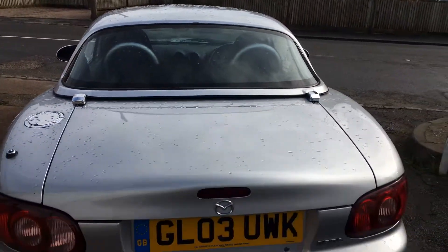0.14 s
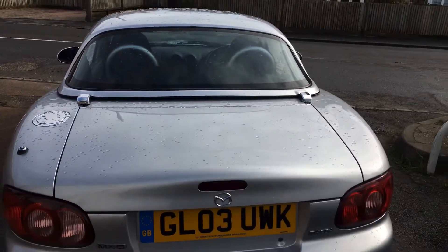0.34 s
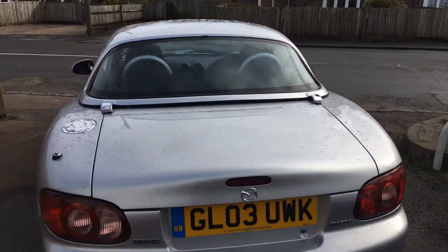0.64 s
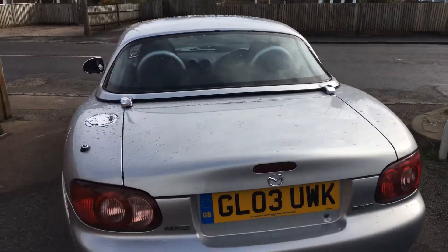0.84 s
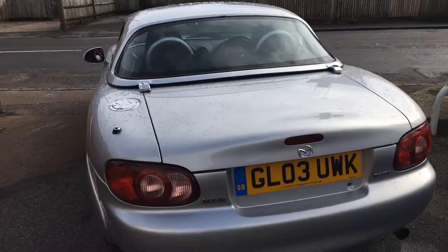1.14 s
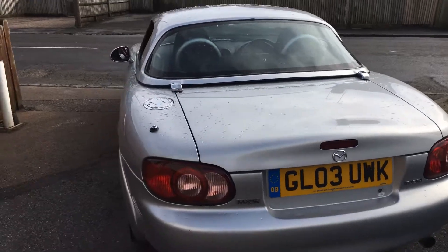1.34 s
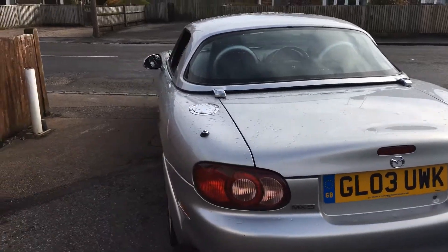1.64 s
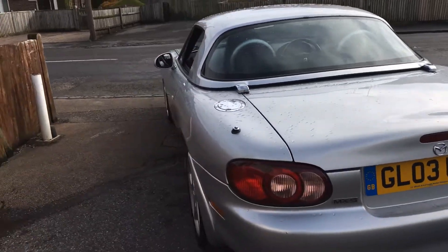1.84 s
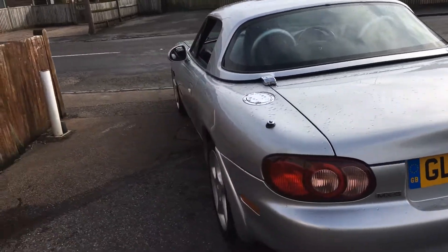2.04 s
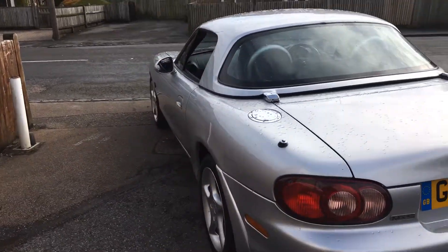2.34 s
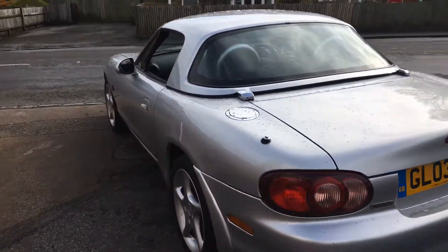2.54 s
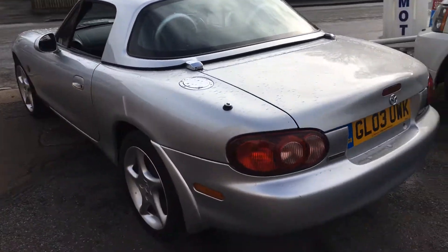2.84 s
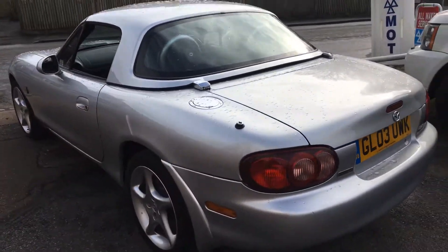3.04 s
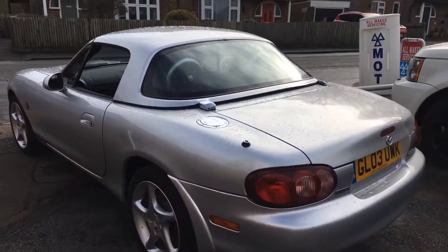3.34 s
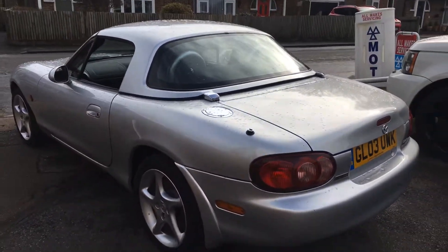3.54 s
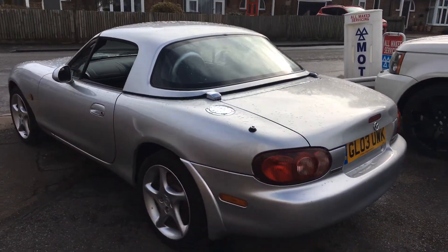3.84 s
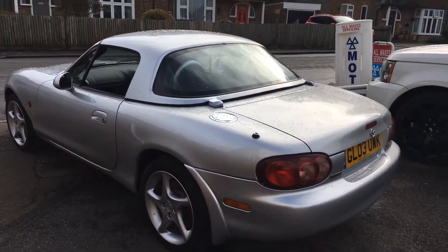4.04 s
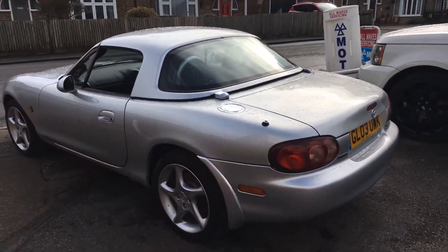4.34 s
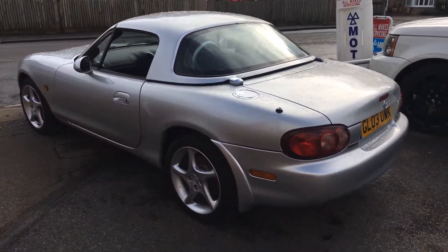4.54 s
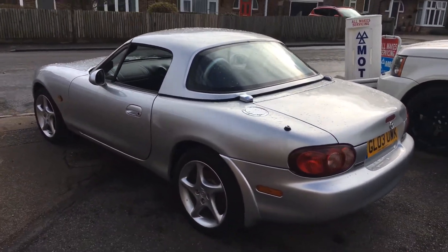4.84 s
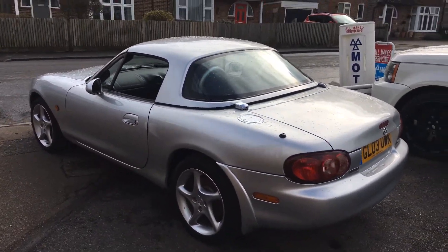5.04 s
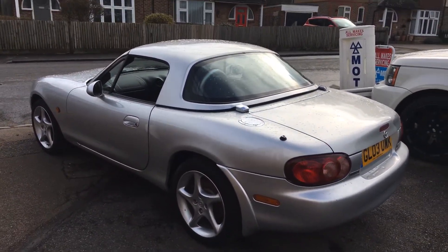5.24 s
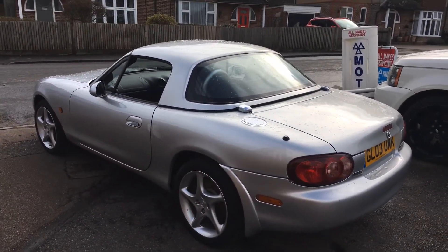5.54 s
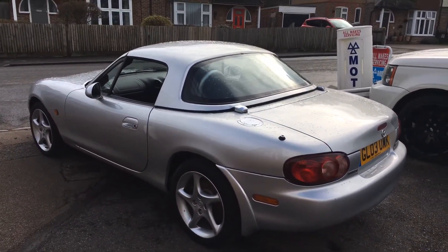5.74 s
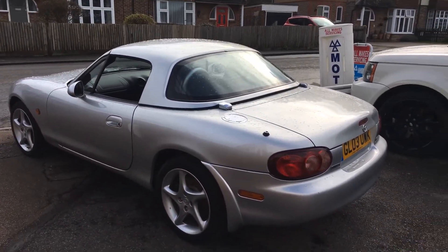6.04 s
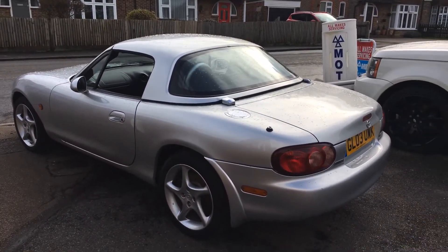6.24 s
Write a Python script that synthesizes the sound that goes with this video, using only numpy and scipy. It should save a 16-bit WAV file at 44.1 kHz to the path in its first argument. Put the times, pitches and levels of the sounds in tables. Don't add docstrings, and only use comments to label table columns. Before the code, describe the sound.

Handheld microphone outdoors beside a parked car. Distant traffic roars faintly and steadily, a thin machine whine fading early. From just after one second, low wind puffs thud irregularly against the microphone, with gritty footstep ticks and tiny key clinks between. A calmer stretch follows, then near the end a huge burst of wind overloads, the background jumps much louder, and small birds chirp.

```python
import sys
import numpy as np
from scipy import signal
from scipy.io import wavfile
from scipy.ndimage import minimum_filter1d, map_coordinates

SR = 44100
rng = np.random.default_rng(int(sys.argv[2]) if len(sys.argv) > 2 else 0)


def decibels_to_gain(level_db):
    exponent = np.asarray(level_db, float) / 20
    return 10 ** exponent


def unload_wav(signal):
    wavfile.write(
        sys.argv[1],
        SR,
        np.round(np.clip(np.atleast_2d(signal).T, -1, 1) * 32767).astype(np.int16),
    )


N = 281358
SECONDS = np.arange(N) / SR
STEP_S, STEP_DB = 5.535, 19

# top_s, top_db
BUFFETS = [(1.114, -45), (1.58, -36), (1.62, -43), (1.668, -40), (1.718, -43), (2.79, -39), (2.85, -43),
           (3.18, -40), (3.37, -43), (3.475, -42), (3.625, -46), (3.835, -47), (4.83, -61), (5.305, -46),
           (5.485, -43), (5.675, -25), (5.83, -32), (1.235, -30), (2.645, -35), (2.97, -33), (5.768, -26),
           (5.8, -32)]


def in_time(rows):
    s, *columns = np.transpose(rows)
    return [np.interp(SECONDS, s, column) for column in columns]


def after_step():
    return SECONDS - STEP_S


def rms_one(x):
    return x / np.sqrt(np.mean(x ** 2) + 1e-20)


def cut(x, hz, kind, order):
    return signal.sosfilt(signal.butter(order, hz, kind, fs=SR, output="sos"), x)


def drift(rate):
    r = np.exp(-80 * np.pi * rate / SR)
    white = rng.standard_normal(N // 40 + 2002)
    slow = signal.lfilter([1], [1, -2 * r, r * r], white)[2000:]
    return np.interp(np.arange(N) / 40, np.arange(len(slow)), rms_one(slow))


def ring(x, hz, t60):
    r, w = decibels_to_gain(-60 / (t60 * SR)), 2 * np.pi * hz / SR
    return signal.lfilter([0, np.sin(w)], [1, -2 * r * np.cos(w), r * r], x + 1e-18)


def add(out, s, x):
    i = int(s * SR)
    out[i:i + len(x)] += x[:N - i]


def street_levels():
    # time_s, level_db before the level is turned up
    tyre_roar = [(0, -62), (.5, -60.5), (1, -61.5), (1.6, -62.5), (2.2, -64.5), (2.8, -66), (3.4, -65.5),
                 (4, -65.5), (4.6, -65.5), (5.1, -63.5), (5.5, -62), (5.6, -66.5), (6.38, -64.5)]
    drone_db, drone_start_db, drone_fade_s = -3, 13, 0.75
    swell_db, swell_s, swell_width_s = 3, 4.75, .35
    hiss_db, hiss_follows, air_db, air_follows = 1.64, .45, 4, .05
    turned_drone_db, turned_hiss_db, turned_air_db = 5, 6.5, -12
    roar_db, = in_time(tyre_roar)
    up = after_step() > 0
    swing_db = roar_db + 63.5
    settle_db = up * 3 * np.exp(-np.abs(after_step()) / 0.19)
    low_db = drone_db + drone_start_db * np.exp(-SECONDS / drone_fade_s) - swing_db
    low_db = low_db + up * turned_drone_db
    low_db = low_db + swell_db * np.exp(-((SECONDS - swell_s) / swell_width_s) ** 2)
    upper_db = hiss_db - (1 - hiss_follows) * swing_db + up * turned_hiss_db + settle_db
    top_db = air_db - (1 - air_follows) * swing_db + up * turned_air_db + settle_db
    return roar_db + up * STEP_DB, low_db, upper_db, top_db


def street(patchy_db, quiet_top_db):
    control_hz = [400, 2200, 3600, 10000]
    # pitch_hz, density_db (dB per Hz)
    colour = [(150, 0), (350, -2), (480, -6.5), (700, -3), (1000, 1.5), (1700, 1.5), (2100, -4),
              (2600, -15), (3300, -23), (4500, -27.5), (5300, -28.5), (7000, -32.5), (9500, -35.5),
              (12200, -36.5), (15000, -42)]
    roar_db, low_db, upper_db, air_db = street_levels()
    controls = [low_db, 0 * roar_db, upper_db, air_db]
    hz, density_db = np.transpose(colour)
    white = rng.standard_normal((2, N))
    edges = np.append(88 * 2 ** np.arange(0, 7.4, 1 / 3), 16000)
    out, together = 0, drift(22)
    for k, (low, high) in enumerate(zip(edges, edges[1:])):
        place = np.log(low * high) / 2
        shares = [np.interp(place, np.log(control_hz), row) for row in np.eye(4)]
        moved_db = sum(share * control for share, control in zip(shares, controls))
        if high == edges[-1]:
            moved_db = moved_db + quiet_top_db * (after_step() < 0)
        flicker_db = patchy_db * (0.83 * together + drift(14))
        band_db = np.interp(place, np.log(hz), density_db) + flicker_db + moved_db + roar_db + 11.0
        out = out + decibels_to_gain(band_db) * cut(white[k % 2], [low, high], "band", order=4)
    return out


def whine():
    # time_s, level_db
    fading = [
        (0, -83.5),
        (.4, -82.5),
        (.8, -83.5),
        (1.2, -88.5),
        (1.8, -92.5),
    ]
    level_db, = in_time(fading + [(2.6, -110)])
    width_hz = 520
    return decibels_to_gain(level_db) * rms_one(ring(rng.standard_normal(N), 5450, 2.5 / width_hz))


def birds():
    # start_s, length_s, start_hz, end_hz, level_db
    clear = [
        (5.958, .055, 7450, 6800, -71.5),
        (6.113, .063, 7900, 6750, -67),
        (6.116, .021, 5600, 6300, -68),
        (6.137, .032, 4500, 4750, -62),
        (6.205, .025, 4170, 4150, -62),
    ]
    # start_s, length_s, start_hz, end_hz, level_db
    hoarse = [
        (3.705, .038, 3950, 3750, -84),
        (4.508, .038, 4550, 4350, -83.5),
        (5.78, .05, 6080, 5900, -69),
        (5.89, .03, 4500, 4500, -64),
        (6.149, .033, 4130, 3850, -57.5),
        (6.175, 0.06, 3200, 3150, -61),
    ]
    out, wobble, flutter = np.zeros(N), drift(130), drift(120)
    # wobble in Hz, arch of the pitch in Hz (whistles sag, chirps arch up in the middle)
    notes = [(*row, 25, -90) for row in clear] + [(*row, 110, 90) for row in hoarse]
    for start, length, start_hz, end_hz, level_db, hoarse_hz, arch_hz in notes:
        span = slice(int(start * SR), int((start + length) * SR))
        u = np.linspace(0, 1, span.stop - span.start)
        glide = np.interp(u, [0, .5, 1], [start_hz, (start_hz + end_hz) / 2 + arch_hz, end_hz])
        pitch = glide + hoarse_hz * wobble[span]
        flutter_db = (1.0 + 0.016 * hoarse_hz) * flutter[span]
        loud = np.sin(np.pi * u) ** 0.37 * decibels_to_gain(level_db + flutter_db)
        out[span] += loud * np.sin(2 * np.pi * np.cumsum(pitch) / SR)
    dull = cut(out, 6800, "low", order=2)
    for lag_s, echo_db in [(.011, -11), (.019, -12), (.031, -13), (.047, -15)]:
        add(out, lag_s, decibels_to_gain(echo_db) * dull)
    return out


def keys():
    # pitch_hz, t60_s
    modes = [
        (5950, .055),
        (8350, .055),
        (14950, .07),
        (5250, .05),
    ]
    # start_s, then the level_db of each mode in turn
    clinks = [
        (2.042, -72, -74, -76, -98.5),
        (2.163, -75, -94.5, -85, -98),
        (2.311, -96, -74.5, -73, -98),
        (2.601, -98, -98, -82, -97.5),
        (2.855, -81, -98, -69, -88),
        (3.988, -80, -71.5, -89.5, -62.5),
        (4.012, -78.5, -77, -98, -71),
        (4.092, -98, -97, -98, -78.5),
        (4.486, -89, -74.5, -88, -96.5),
    ]
    out, table = np.zeros(N), np.array(clinks)
    chatter = np.hanning(260) * rng.standard_normal((len(modes), 260))
    for (hz, t60), strength_db, contact in zip(modes, table[:, 1:].T, chatter):
        clicks = np.zeros(N)
        clicks[(table[:, 0] * SR).astype(int)] = decibels_to_gain(strength_db)
        turning = np.exp(2j * np.pi * hz * np.arange(len(contact)) / SR)
        contact = contact / abs(contact @ turning)
        out += ring(signal.fftconvolve(clicks, contact, "same"), hz, t60)
    return out


def ticks():
    # start_s, peak_db, centre_hz
    grit = [(.353, -62.5, 6300), (1.914, -70, 8600), (1.988, -59, 8000), (1.988, -58, 2000),
            (2.03, -72, 8000), (2.311, -71, 8900), (2.584, -70.5, 11000), (2.61, -71, 3800),
            (2.647, -66, 11500), (2.656, -63, 2200), (2.685, -59, 2050), (2.709, -48, 1700),
            (2.709, -68, 6000), (2.729, -69, 3500), (2.741, -51, 1800), (2.826, -67.5, 6700),
            (2.876, -67, 3600), (2.683, -71.5, 11000), (2.741, -70, 8000), (2.936, -62, 11000),
            (3.008, -62, 11500), (3.099, -62.5, 2400), (3.288, -71, 8400), (3.364, -58, 2600),
            (3.443, -69, 7900), (4.486, -66.5, 9500), (4.538, -71.5, 11700), (5.849, -62, 8800),
            (5.884, -62, 10000)]
    # start_s, peak_db, low_hz, high_hz, t60_s
    scuffs = [(2.717, -71, 2500, 7000, .07), (3.475, -76.5, 7550, 9500, .06), (3.974, -65, 3500, 9500, .03),
              (3.987, -61.5, 2000, 6500, .083), (3.987, -62, 6500, 15600, .079),
              (4.008, -63.5, 4530, 15900, .05), (4.026, -68, 4500, 9500, .043),
              (4.612, -67, 3000, 6200, .07), (4.613, -72, 8200, 9900, .074), (4.629, -67, 3000, 7000, .05),
              (4.643, -59.5, 1000, 5900, .044)]
    # pitch_hz, width_hz, level_db
    hollows = [
        (5540, 770, -2),
        (9000, 710, -5),
    ]
    out, fall = np.zeros(N), np.arange(3500) / SR
    half = 2 ** (1.1 / 2)
    rows = scuffs + [(s, peak_db, hz / half, hz * half, .009) for s, peak_db, hz in grit]
    white = rng.standard_normal((len(rows), 3500))
    for (s, peak_db, low_hz, high_hz, t60), own in zip(rows, white):
        swell = (1 - np.exp(-fall / (.07 * t60))) * decibels_to_gain(-60 * fall / t60)
        burst = cut(own * swell, [low_hz, min(high_hz, 17000)], "band", order=2)
        add(out, s, decibels_to_gain(peak_db) * burst / np.abs(burst).max())
    coloured = 0.69 * out
    for hz, width_hz, level_db in hollows:
        coloured = coloured + decibels_to_gain(level_db) * signal.lfilter(*signal.iirpeak(hz, hz / width_hz, SR), out)
    return coloured


def wind_level():
    # time_s, level_db before the level is turned up
    breeze = [
        (0, -61.5),
        (1.05, -63),
        (1.2, -66),
        (3.9, -66),
        (4.3, -68),
        (5.25, -67),
        (5.9, -62),
        (6.38, -61),
    ]
    # top_s, top_db, rise_s per 20 dB, fall_s per 20 dB
    gusts = [(.43, -54, .04, .5), (.78, -56, .1, 0.41), (.97, -55, 0.04, 0.29), (1.225, -33, .04, .25),
             (1.34, -35, .1, 0.23), (1.5, -46, 0.18, 0.17), (1.79, -44, 0.01, .15), (1.97, -50, 0.04, .2),
             (2.08, -36, 0.05, .25), (2.19, -39, 0.11, 0.14), (2.38, -45, 0.03, .4), (2.64, -41, .3, .4),
             (2.97, -34, 0.1159, 0.13), (3.1, -44, .1, 0.38), (3.29, -42, 0.09, .3),
             (3.69, -38, 0.02, 0.1155), (4.03, -55, 0.08, 0.15), (4.145, -47, 0.09, 0.08),
             (4.68, -59, 0.22, 0.09), (5.15, -57, .15, 0.16), (5.36, -48, 0.09, 0.28),
             (5.57, -31, 0.0571, 0.04), (5.632, -23, 0.0468, 0.06), (5.765, -31, 0.05, 0.09),
             (5.93, -37, .2, 0.12)]
    rumbles = [(s, top_db - 5, .025, .035) for s, top_db in BUFFETS]
    power = decibels_to_gain(in_time(breeze)[0] + STEP_DB * (after_step() > 0)) ** 2
    for s, top_db, rise_s, fall_s in gusts + rumbles:
        below = np.maximum((s - SECONDS) / rise_s, (SECONDS - s) / fall_s)
        power = power + decibels_to_gain(top_db - 20 * below) ** 2
    return 10 * np.log10(power)


def eddies(size):
    large = signal.butter(2, [.008, .026], "band", output="sos")
    small = signal.butter(3, .06, "low", output="sos")
    white = rng.standard_normal((2, size + 2000))
    large_air = rms_one(signal.sosfilt(large, white[0]))
    small_air = rms_one(signal.sosfilt(small, white[1]))
    return rms_one((large_air + 0.16 * small_air)[2000:])


def wind(level_db, rumble_hz, lumpy_db):
    true_db = level_db - STEP_DB * (np.arange(N) > STEP_S * SR)
    lumps = drift(18)
    speed = decibels_to_gain(.33 * lumpy_db * lumps + .15 * (true_db + 48))
    place = np.cumsum(rumble_hz * speed) * 100 / SR
    air = eddies(size=N // 2)
    return decibels_to_gain(level_db + lumpy_db * lumps) * map_coordinates(air, [place], order=3)


def puff_rows(level_db):
    # top_s, peak_db, pitch_hz
    strong = [(1.2156, -25, 219), (1.2257, -30, 207), (1.2626, -32, 177), (1.2991, -32.5, 206),
              (1.4142, -26.5, 217), (1.5815, -30.5, 229), (1.6621, -35, 182), (1.8024, -43, 228),
              (2.0682, -27.5, 182), (2.1023, -31, 190), (2.1594, -28, 202), (2.2005, -31.5, 189),
              (2.2342, -35, 290), (2.2634, -39, 210), (2.43, -40.5, 205), (2.6236, -26.5, 242),
              (2.6392, -31.5, 198), (2.7375, -31, 199), (2.7504, -31, 261), (2.7952, -29, 216),
              (2.8471, -35.5, 222), (2.94, -37, 206), (2.9611, -30, 199), (2.9818, -28, 205.7),
              (3.0054, -33, 236), (3.131, -31.5, 217), (3.466, -43, 191), (3.616, -47, 255),
              (3.8278, -47.5, 199), (5.3017, -46.5, 215)]
    # top_s, peak_db, pitch_hz, length_ms, ragged_db against the peak
    slaps = [(1.334, -37.5, 327, 3.3, -12), (1.3432, -31, 187, 6, -18), (1.373, -22.5, 259.5, 2.05, -19.5),
             (1.7164, -37.5, 245, 2.3, -18), (2.0849, -31, 264, 2.7, -14), (2.1418, -31, 246, 2.8, -13),
             (2.146, -34, 377, 3.9, -6), (2.1903, -30.5, 236, 3.7, -16.5), (2.3728, -39, 223, 3.5, -17),
             (2.6019, -37.5, 275, 4.3, -17), (3.0164, -34.5, 215, 3.9, -16), (3.1496, -34.5, 253, 2.3, -14),
             (3.1716, -38.5, 236, 11.4, -10), (3.2866, -37.5, 223, 6.7, -16.5),
             (3.3456, -31.5, 313.5, 3.5, -8), (3.3648, -34, 341, 3.7, -9), (3.6832, -36.5, 298, 8.3, -10),
             (3.69, -32, 109, 13.7, -22.5), (3.7083, -38.5, 222, 3.3, -13), (5.4685, -49, 276, 6, -13.5),
             (2.5615, -42.5, 265, 10.7, -15), (2.9209, -42, 270, 3.3, -15), (3.2145, -44, 207, 6.5, -15),
             (3.4125, -46, 271, 4.7, -17.5)]
    # top_s, peak_db, pitch_hz, length_ms, ragged_db against the peak
    burst = [
        (5.568, -30.5, 253, 8.7, -15.5),
        (5.621, -22, 296, 3.2, -19),
        (5.627, -12, 218.7, 4.4, -15),
        (5.6315, -10, 100, 8, -25),
        (5.6365, -10.5, 289, 4.6, -17),
        (5.6415, -15, 537, 5.04, -21),
        (5.6525, -24, 205, 2.5, -15.5),
    ]
    gap_s, smooth_fray_db = .022, -23
    s = np.arange(.1, 6.3, gap_s)
    late, size, pitch = rng.standard_normal((len(s), 3)).T
    s = s + gap_s * np.tanh(late) / 2
    level_db = minimum_filter1d(level_db, size=1200)
    here_db = level_db[(s * SR).astype(int)]
    true_db = here_db - STEP_DB * (s > STEP_S)
    small_db = here_db + 0.5 + 3 * size + .35 * (true_db + 45)
    smooth = [(*row, smooth_fray_db) for row in strong]
    smooth += [(a, b, 215 * decibels_to_gain(2.4 * c), -18) for a, b, c in zip(s, small_db, pitch)]
    timed = [(a, b, hz, 4.1 * (210 / hz) ** 1.8, fray_db) for a, b, hz, fray_db in smooth]
    # 100 Hz, 13 ms
    swings = [(a, b + 4.5, 100, 13, smooth_fray_db - 10) for a, b in BUFFETS]
    return slaps + burst + swings + timed


def puffs(rows):
    out, t = np.zeros(N), np.arange(-2000, 2000) / SR
    ragged = rms_one(cut(rng.standard_normal(N), [400, 900], "band", order=3))
    for (s, peak_db, hz, ms, fray_db), turn in zip(rows, rng.random(len(rows))):
        bell = np.exp(-(1250 * t / np.clip(ms, 2, 40)) ** 2)
        phase = np.cumsum(hz * (.5 + 0.61 * bell)) / SR + turn
        fray = bell ** 1.7 * ragged[int(s * SR) - 2000:][:4000]
        fray *= decibels_to_gain(fray_db + 3.0) / np.abs(fray).max()
        add(out, s + t[0], decibels_to_gain(peak_db - 1.0) * (bell * np.cos(2 * np.pi * phase) + fray))
    return out


def scene():
    background = street(patchy_db=0.87, quiet_top_db=-16) + whine() + birds()
    level_db = wind_level()
    air = wind(level_db, rumble_hz=78, lumpy_db=2.5) + puffs(puff_rows(level_db))
    air = cut(air, 37, "high", order=3)
    overload = .36
    air = cut(overload * np.tanh(air / overload), 1600, "low", order=3)
    return (background + keys() + ticks() + air)[None]


def roll_off(x):
    return signal.sosfilt(signal.butter(12, 15750, fs=SR, output="sos"), x)


def record(dry):
    dip_hz, dip_width_hz, dip_depth = 10520, 970, .4
    hollow = signal.lfilter(*signal.iirpeak(dip_hz, dip_hz / dip_width_hz, SR), dry)
    return roll_off(dry - dip_depth * hollow)


dry = scene()
out = record(dry)
unload_wav(out)
```